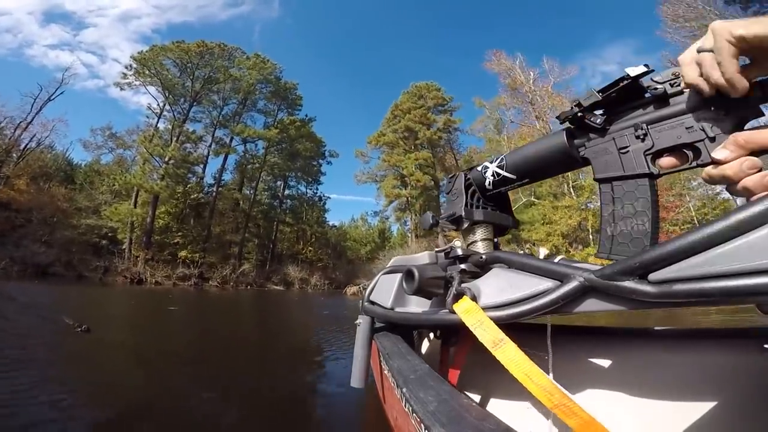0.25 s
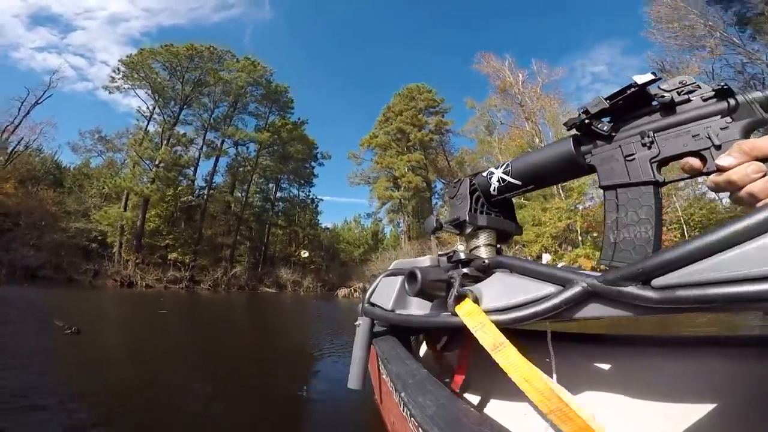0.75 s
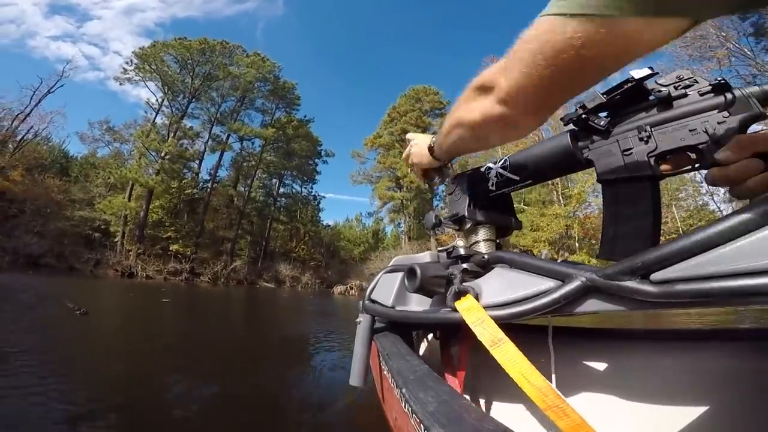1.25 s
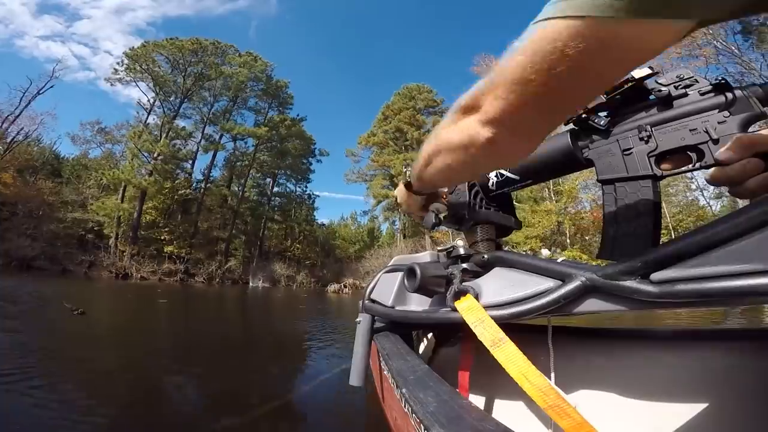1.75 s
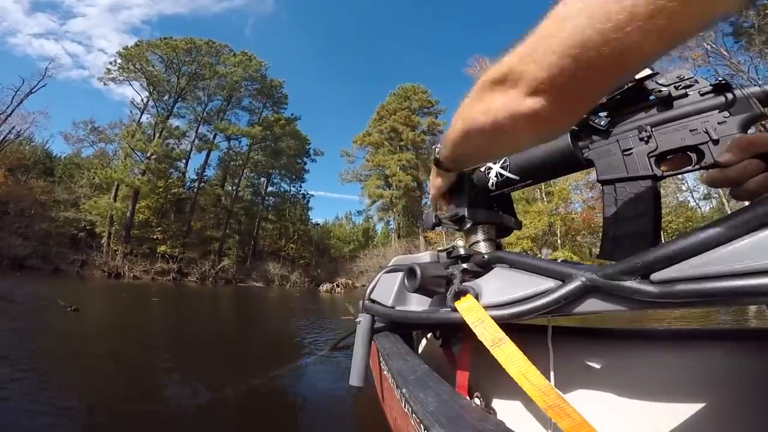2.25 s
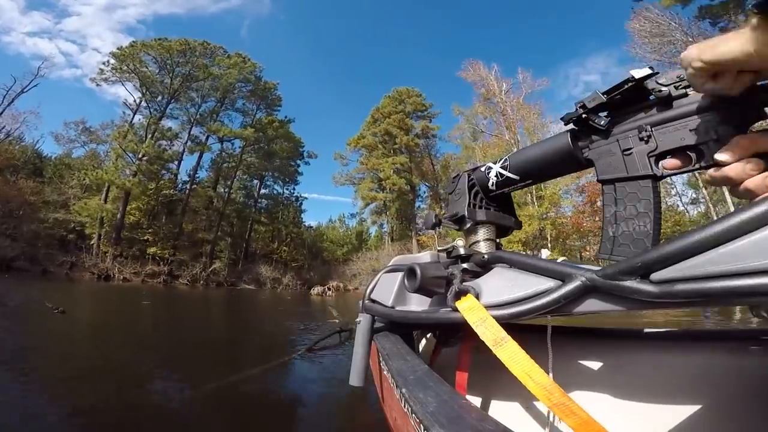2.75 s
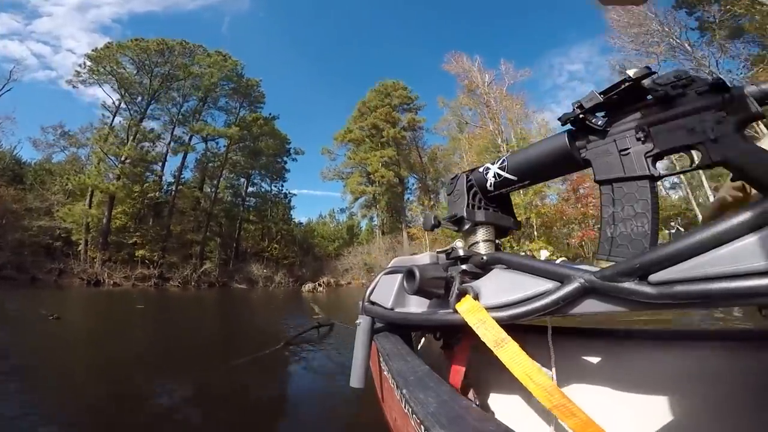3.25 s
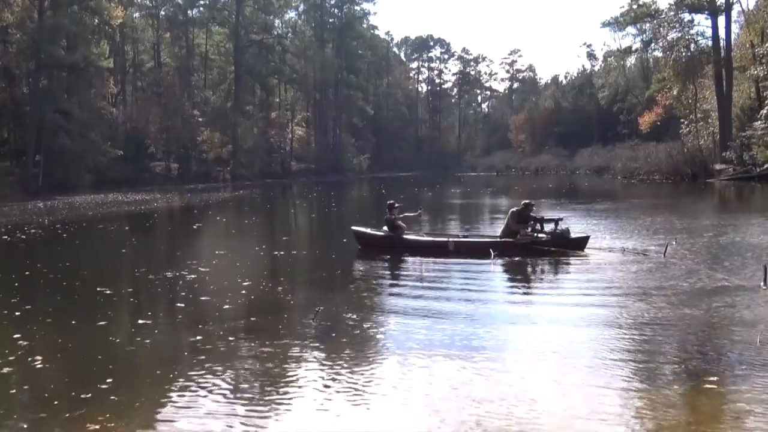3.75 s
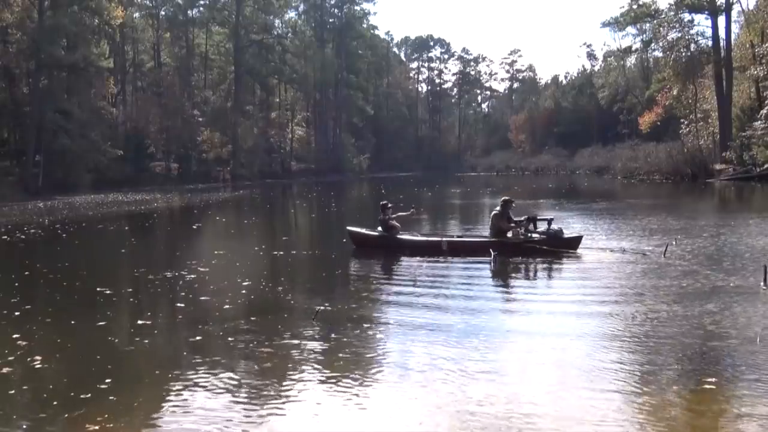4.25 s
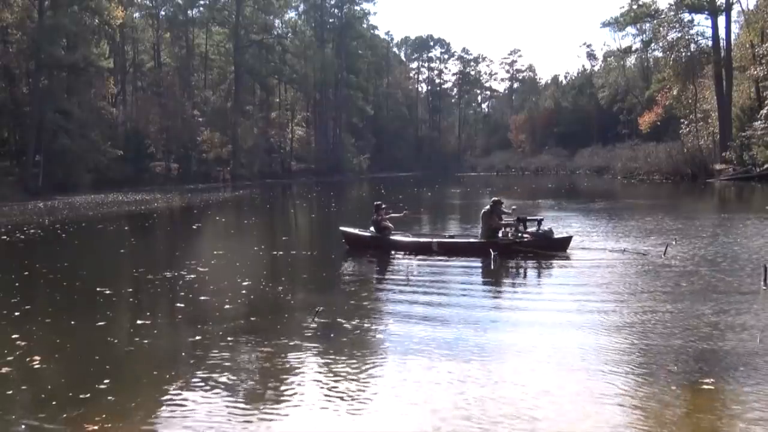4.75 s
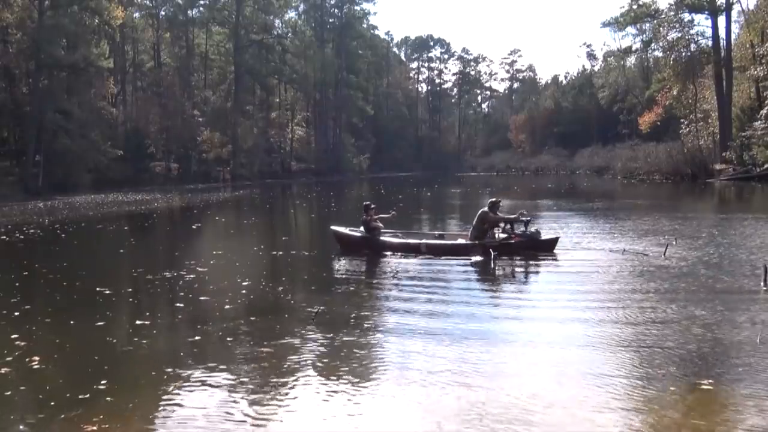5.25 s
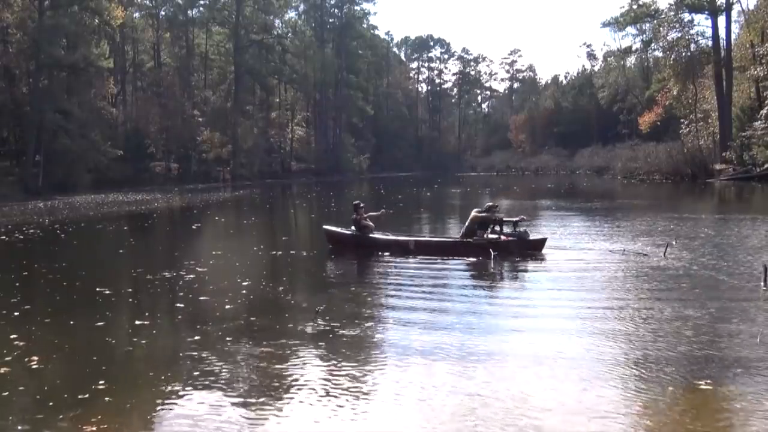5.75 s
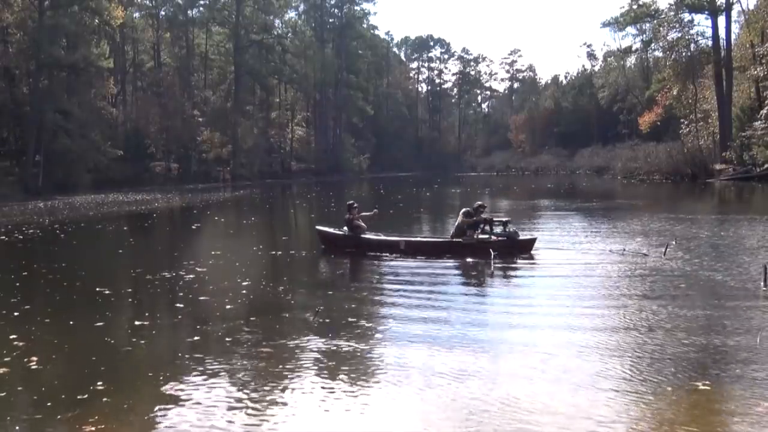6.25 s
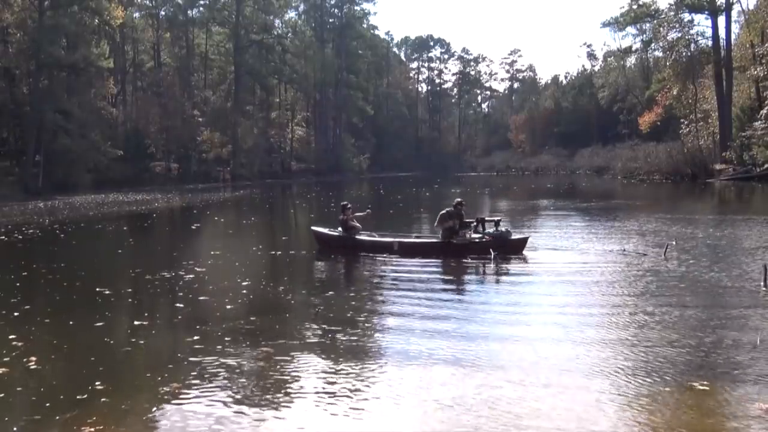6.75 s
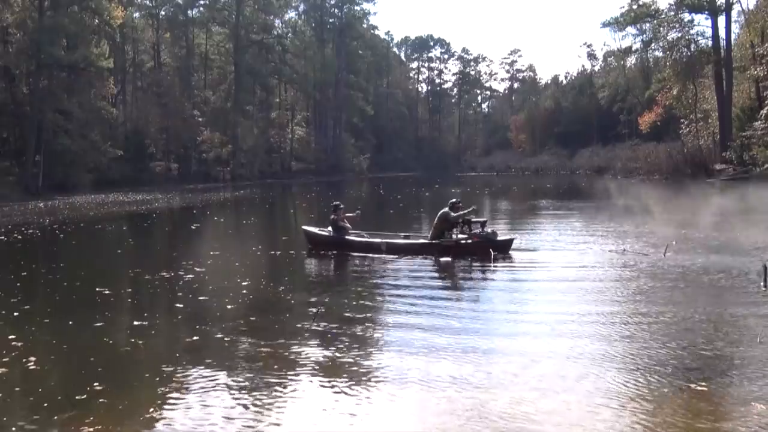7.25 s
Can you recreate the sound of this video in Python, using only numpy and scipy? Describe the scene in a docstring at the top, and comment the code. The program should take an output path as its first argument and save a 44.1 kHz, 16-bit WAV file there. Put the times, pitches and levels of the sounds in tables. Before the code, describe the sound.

A microphone on a canoe's hull picks up hands knocking and scraping on a blank-firing launcher, with hollow thumps from the boat. Twice the action is racked and a short, gassy shot pops. The sound then shifts to the bank of a forest lake, where wind buffets the microphone. Metal clacks carry over the water, and two sharp shots each roll back from the trees.

```python
"""A blank-firing launcher on a canoe, on a lake in the forest. First, from a mono camera clamped to
the hull: the boat rocks, hands load and cock the action, and two shots rush up the tube, with every
knock ringing the camera housing and drumming the hull. Then, from a stereo camera on the bank: wind
buffets both microphone ports as the last echo fades. Across the water the action clacks, the bolt
slams and the launcher fires, twice over, and the forest roars back after each shot."""
import sys
import numpy as np
from scipy import signal
from scipy.fft import rfft, irfft, next_fast_len
from scipy.io import wavfile
from scipy.ndimage import uniform_filter1d, minimum_filter1d, map_coordinates

SR = 44100
rng = np.random.default_rng(int(sys.argv[2]) if len(sys.argv) > 2 else 0)


def store_wav(level_fs):
    """Save 16-bit WAV to argv[1]."""
    pcm = np.round(np.clip(np.atleast_2d(level_fs), -1, 1) * 32767)
    wavfile.write(sys.argv[1], SR, pcm.T.astype(np.int16))


N = 330750
TIME = np.arange(N) / SR


def amp(db):
    return 10 ** (np.asarray(db) / 20)


def unit(x):
    return x / np.sqrt(np.mean(x ** 2) + 1e-20)


def along(points, hz):
    """Read (Hz, value) points on a log axis."""
    freqs, values = np.transpose(points)
    return np.interp(np.log(hz + 1), np.log(freqs + 1), values)


def curves(rows):
    """One value per sample for each column after the time."""
    times, *columns = np.transpose(rows)
    return [np.interp(TIME, times, column) for column in columns]


def wobble(rate):
    """A smooth random curve, rate knots a second."""
    return map_coordinates(rng.standard_normal(int(N * rate / SR) + 4), [TIME * rate])


def filtered(x, response):
    """x through a gain given as a function of Hz."""
    size = next_fast_len(N + 8192)
    return irfft(rfft(x, size) * response(np.fft.rfftfreq(size, 1 / SR)), size)[..., :N]


def noise(spectrum):
    """Mono noise of rms 1."""
    return unit(filtered(rng.standard_normal(N), lambda hz: amp(along(spectrum, hz))))


def resonate(modes):
    """Noise of rms 1 through a set of resonances twice, so that the valleys stay dark."""
    def body(hz):
        return sum((-1) ** k * amp(db) * 1j * hz * width / (centre ** 2 - hz ** 2 + 1j * hz * width)
                   for k, (centre, width, db) in enumerate(modes))
    return unit(filtered(rng.standard_normal(N), lambda hz: body(hz) ** 2))


def varied(modes, spread_db=4.5):
    """Noise of rms 1 in modes whose strengths wander, as each spot struck favours other modes."""
    return unit(sum(amp(db + spread_db * np.tanh(wobble(28))) * resonate([(hz, width, 0)])
                    for hz, width, db in modes))


def bursts(times, levels_db, rise, t60, tail_db, tail_t60):
    """Envelope of a row of contacts: each grinds in, dies fast and leaves a weaker tail."""
    power, lead = np.zeros(N + SR), SR // 8
    t = (np.arange(SR // 2) - lead) / SR - .002
    fall = amp(-60 * t / t60) + amp(tail_db - 60 * t / tail_t60)
    shape = np.where(t < 0, amp(60 * t / rise), fall / (1 + amp(tail_db)))
    for start, db in zip(times, levels_db):
        power[round(start * SR):][:len(t)] += (amp(db) * shape) ** 2
    return np.sqrt(power[lead:lead + N])


def strokes(rows, rise, fall):
    """Treble and mid gain of strokes that rise, hold and fall; slopes in dB per second."""
    t, power = TIME[::50], 0
    for start, length, *levels_db in rows:
        drop_db = rise * np.clip(start - t, 0, None) + fall * np.clip(t - start - length, 0, None)
        power += amp(np.array(levels_db)[:, None] - drop_db) ** 2
    return np.array([np.interp(TIME, t, np.sqrt(band)) for band in power])


def struck(times, levels_db, ring):
    """The same ring at each blow, peaking at that blow's level."""
    blows = np.zeros(N)
    blows[np.round(np.asarray(times) * SR).astype(int)] = amp(levels_db)
    return signal.fftconvolve(blows, ring / np.abs(ring).max())[:N]


# The stereo pair on the bank. Each row: frequency in Hz, left-right correlation.
PAIR_LIKENESS = [(60, 0.19), (180, 1), (550, 0.98), (1650, 0.99), (4970, 0.4), (15000, -0.53)]
def wide(spectrum):
    """Stereo noise of rms 1, alike in the mids and drifting apart in deep bass and treble."""
    def response(hz):
        angle = np.arccos(np.clip(along(PAIR_LIKENESS, hz), -1, 1)) / 2
        return amp(along(spectrum, hz)) * [np.cos(angle), np.sin(angle)]
    mid, side = filtered(rng.standard_normal((2, N)), response)
    return unit(np.array([mid + side, mid - side]))


# Leaves and microphone hiss. Each row: frequency in Hz, relative level in dB.
LEAF_SPECTRUM = [(150, -22), (250, -0.5), (393, -3), (1240, -9), (1850, -15), (5730, -19), (16000, -35.5)]
def leaves():
    """The breeze in the leaves along the bank; its level sinks slowly."""
    return amp(np.interp(TIME, [4.4, 6.2], [-37, -40]) + wobble(7)) * wide(LEAF_SPECTRUM)


# Wind on the ports. Each row: frequency in Hz, relative level in dB.
BUFFET_SPECTRUM = [(12, -6.5), (20, 2.5), (45, -1.5), (66, -6), (200, -30), (300, -47), (390, -67),
                   (660, -120)]
# Gusts. Each row: time in seconds, left level in dB, right level in dB.
GUSTS = [(3.5, -9.5, -18), (3.8, -13.5, -17.5), (4.02, -7, -14), (4.3, -12, -15.5), (4.54, -14.5, -20),
         (4.67, -10, -15.5), (4.9, -22, -30), (5.15, -12, -14.5), (5.32, -5, -8), (5.6, -5.5, -16.5),
         (5.84, -16, -21.5), (5.97, -0.5, 1), (6.15, -6, -15.5), (6.45, -16.5, -18.5), (6.62, -8.5, -17),
         (6.75, -17, -23), (7.05, -16.5, -24), (7.27, -3.5, -20), (7.45, -16, -23)]
def wind(opposed_share=0.18):
    """Buffeting right on the bank microphone; part of it pushes one port as it pulls the other."""
    common, *own = [unit(amp(2.2 * wobble(14)) * noise(BUFFET_SPECTRUM)) for _ in range(3)]
    ports = np.sqrt(opposed_share) * common * [[1], [-1]] + np.sqrt(1 - opposed_share) * np.array(own)
    return 0.84 * np.tanh(amp(curves(GUSTS)) * ports / 0.87)  # big swings flatten in the capsules


# A thin hiss. Each row: frequency in Hz, relative level in dB.
HISS_SPECTRUM = [(5000, -39.5), (7000, -11), (9000, 5), (10500, -0.5), (11500, -6), (13000, -16),
                 (16000, -41.5)]
# Its course. Each row: time in seconds, level in dB.
HISS_LEVELS = [(0, -77), (.6, -68), (.75, -100), (1.7, -80), (2.3, -69.5), (2.95, -66), (3.08, -100)]
def thin_hiss():
    """At the hull microphone, a faint high hiss creeps up before each shot."""
    return amp(curves(HISS_LEVELS)[0]) * noise(HISS_SPECTRUM)


# The boat's rumble. Each row: frequency in Hz, relative level in dB.
RUMBLE_SPECTRUM = [(12, -34.5), (20, 2.5), (70, -1.5), (130, -3), (170, -19), (290, -120)]
# Slow rocking. Each row: time in seconds, level in dB.
ROCKING = [(0.02, -40), (0.4, -28), (0.8, -48), (1.2, -62), (1.8, -41), (2.2, -32), (2.7, -33), (3.12, -40),
           (3.43, -51)]
def hull_rumble():
    """The canoe rocks under the camera, and every thump in KNOCKS shakes it."""
    starts, *_, thump_db = np.transpose(KNOCKS)
    shake = bursts(starts, thump_db - 5.5, rise=0.15, t60=0.51, tail_db=-29.5, tail_t60=0.46)
    return np.hypot(amp(curves(ROCKING)[0]), shake) * noise(RUMBLE_SPECTRUM)


# Treble of the hands, treble of the echo after each shot, mids of both. Each row: frequency in Hz, relative
# level in dB.
SLIDE_SPECTRUM = [(2200, -50), (3000, -17), (3700, -11), (4100, 0), (4500, -8), (5400, -9), (6500, -25),
                  (9200, -33), (11500, -55)]
SHOT_ECHO_SPECTRUM = [(1530, -40.5), (2600, -15), (3150, -10), (3770, -3), (4810, 0), (5570, -6), (6800, -21.5),
                      (8000, -34), (10400, -53.5), (17600, -120)]
MURMUR_SPECTRUM = [(65, -40.5), (110, -18), (123, -21), (167, -1), (306, -10.5), (409, -4), (525, -15),
                   (2210, -28), (3000, -50), (3900, -90.5), (6600, -120)]
# Soft hand moves. Each row: start and length in seconds, treble and mid levels in dB.
HAND_SLIDES = [(0.06, 0.25, -52, -44.5), (2.04, 0.13, -61.5, -46), (2.29, .07, -65, -47),
               (2.42, 0.13, -45, -36.5)]
def slides_and_echo():
    """Close by, sliding hands hiss and a faint echo follows each shot; the treble flickers."""
    still_gain = amp([[-79], [-50]])  # treble and mid between the moves
    hand_top, hand_mid = np.hypot(strokes(HAND_SLIDES, rise=830, fall=130), still_gain)
    echoes = [(start + 0.093, 0.23, -57.5, -37) for start, *_ in NEAR_SHOTS]
    echo_top, echo_mid = strokes(echoes, rise=71, fall=98)
    flicker = amp(3.6 * wobble(24.18))
    treble = flicker * (hand_top * noise(SLIDE_SPECTRUM) + echo_top * noise(SHOT_ECHO_SPECTRUM))
    return treble + np.hypot(hand_mid, echo_mid) * amp(0.5 * wobble(12)) * noise(MURMUR_SPECTRUM)


# Rasp through the hull camera's housing. Each row: frequency in Hz, relative level in dB.
RASP_SPECTRUM = [(1590, -46), (2700, -12.5), (3860, 2.5), (4350, -3.5), (5280, -17.5), (6850, -14),
                 (8430, -16.5), (10600, -32.5), (12400, -13), (15200, -30.5), (16000, -34)]
# Its treble modes. Each row: frequency and width in Hz, relative level in dB.
HOUSING_TOP_MODES = [(3920, 300, 0), (4650, 220, -2), (5250, 500, -2)]
def housing_treble(ring_share=.7):
    """The housing round the microphone splits its power between a broad rasp and ringing modes."""
    rasp = np.sqrt(1 - ring_share) * noise(RASP_SPECTRUM)
    return rasp + np.sqrt(ring_share) * varied(HOUSING_TOP_MODES)


# The housing's mid modes. Each row: frequency and width in Hz, relative level in dB.
HOUSING_MID_MODES = [(1160, 230, -1), (1740, 200, 1.5), (1450, 300, -5), (2250, 500, -5), (642.6, 400, -4)]
# Hard strokes of the action. Each row: start and length in seconds, treble and mid levels in dB.
RACK_STROKES = [(0.585, 0.034, -23, -28), (2.825, 0.016, -26, -25.5), (2.9, 0.052, -30, -35)]
def racking():
    """The action slides hard, close up, and scrapes in grains through the housing."""
    grains = unit(amp(4.8 * wobble(400)))
    top_gain, mid_gain = strokes(RACK_STROKES, rise=280, fall=650) * grains
    return top_gain * housing_treble() + mid_gain * varied(HOUSING_MID_MODES)


# Hands and action on board. Each row: start in seconds, then mid, treble and hull thump levels in dB.
KNOCKS = [(0.022, -36, -54, -36), (0.073, -42, -38.5, -28.5), (0.131, -35.5, -46.5, -44),
          (0.331, -33.5, -42, -41), (0.341, -41, -32, -28.5), (0.361, -42, -45, -40),
          (0.391, -44, -45.5, -33), (0.411, -36, -52, -30.5), (0.472, -32, -40, -29),
          (0.484, -29, -31, -27.5), (0.505, -25, -24, -28), (0.531, -20, -18.5, -23), (0.538, -20, -13, -8),
          (0.559, -28, -23.5, -20), (0.581, -25.5, -27.5, -15), (0.602, -26, -26.5, -24),
          (0.611, -20, -13, -11), (0.619, -15, -10, -16), (0.813, -33.5, -63, -33),
          (0.947, -40.5, -55, -28.5), (1.036, -46, -65, -36), (1.163, -53, -68.5, -34.5),
          (1.259, -51, -70, -48), (1.272, -48, -70, -36), (1.323, -53, -62, -31.5),
          (1.38, -39.5, -44.5, -22), (1.409, -48, -52, -25.5), (1.438, -46, -62, -42),
          (1.655, -44.5, -61, -29), (1.859, -40.5, -63, -44), (1.885, -32.5, -49, -36),
          (1.961, -41, -40, -28), (1.98, -42, -36, -16.5), (2.184, -36.5, -47, -19), (2.27, -27, -50, -35),
          (2.288, -35.5, -47.5, -24.5), (2.407, -24, -42, -32), (2.497, -28.5, -36, -22),
          (2.564, -28, -49, -37), (2.607, -25, -44, -17.5), (2.682, -40, -31, -22), (2.776, -34, -30, -31),
          (2.789, -29, -24.5, -21.5), (2.798, -26, -37, -25), (2.814, -32, -21, -24),
          (2.842, -32, -12.5, -15), (2.85, -12, -17, -8), (2.893, -13, -14, -14.5), (2.929, -16, -10, -15),
          (2.941, -21, -12, -20), (2.948, -17, -11.5, -13), (3.074, -38, -44, -28), (3.126, -35, -63, -29),
          (3.351, -41.5, -53, -26.5), (3.401, -41.5, -59, -43)]
def housing_knocks(dull_hz=7700, full_db=-18):
    """Gritty contacts ring the housing; those weaker than full_db lose extra treble above dull_hz."""
    starts, mid_db, top_db, _ = np.transpose(KNOCKS)
    mid = bursts(starts, mid_db, rise=0.029, t60=0.04, tail_db=-16, tail_t60=0.133)
    mid *= varied(HOUSING_MID_MODES)
    low, high = filtered(housing_treble(), lambda hz: np.array([hz < dull_hz, hz >= dull_hz]))
    dulled_db = top_db + 0.5 * np.minimum(top_db - full_db, 0)
    return mid + sum(bursts(starts, db, rise=0.016, t60=0.024, tail_db=-15.5, tail_t60=0.065) * band
                     for db, band in [(top_db, low), (dulled_db, high)])


# The hull as a drum. Each row: frequency and width in Hz, relative level in dB.
HULL_MODES = [(162.4, 62, 5.5), (115, 82, -3), (383, 128, -4), (256, 114, -4.5)]
# Light knocks on the hull. Each row: start in seconds, peak level in dB.
HOLLOW_KNOCKS = [(0.85, -28), (0.949, -24.5), (1.03, -35), (1.166, -27), (1.274, -31.5), (1.325, -29),
                 (1.414, -34.5)]
def hull_thumps(hollow_hz=398, hollow_t60=.075):
    """Under the camera, blows set the hull modes swinging and light knocks sound its hollow note."""
    starts, *_, thump_db = np.transpose(KNOCKS)
    drumming = bursts(starts, thump_db - 1.5, rise=0.025, t60=0.15, tail_db=-9, tail_t60=0.25)
    drumming *= resonate(HULL_MODES)
    t = TIME[:SR // 4]
    swing = sum(amp(db) * np.exp(-np.pi * width * t / 2) * np.sin(2 * np.pi * hz * t)
                for hz, width, db in HULL_MODES)
    note = amp(-60 * t / hollow_t60) * np.sin(2 * np.pi * hollow_hz * t) * (1 - np.exp(-t / 0.0017))
    return drumming + struck(starts, thump_db + 6, -swing) + struck(*np.transpose(HOLLOW_KNOCKS), note)


# Steel heard from the bank, mids and treble. Each row: frequency in Hz, relative level in dB.
STEEL_MID = [(300, -40), (500, -4), (1000, -15.5), (1800, -3), (4000, -8.5), (6000, -41)]
STEEL_TOP = [(2500, -26), (4000, -7.5), (5200, -8.5), (5800, -11), (6500, -7), (9000, -12.5), (12000, -20),
             (16000, -29)]
# Action and cases. Each row: start in seconds, mid and treble levels in dB.
CLACKS = [(3.7123, -27.5, -39), (3.733, -43, -33), (4.359, -33, -41), (4.528, -33, -27),
          (4.541, -33.5, -25.5), (4.565, -25.5, -18.5), (4.5752, -24.5, -20), (4.5952, -19, -16),
          (4.603, -12, -14.5), (4.647, -26, -18), (4.6647, -26.5, -17.5), (4.6809, -16, -14),
          (4.6957, -18, -5), (4.7004, -16, -10), (5.4347, -23, -28), (5.7776, -40, -37),
          (5.807, -33.5, -33), (5.9044, -41.5, -37), (5.931, -48, -38), (6.511, -24, -23.5),
          (6.531, -22.5, -22), (6.539, -14, -12.5), (6.573, -23.5, -17.5), (6.594, -21.5, -21),
          (6.6105, -18.5, -16), (6.62, -18.5, -9), (6.6266, -15, -8), (6.757, -32.5, -41),
          (6.812, -35.5, -43), (7.467, -19, -23.5)]
def far_clacks():
    """The action heard across the water, with a short answer from the shore."""
    starts, mid_db, top_db = np.transpose(CLACKS)
    mid = bursts(starts, mid_db, rise=0.025, t60=0.035, tail_db=-20.5, tail_t60=0.47) * wide(STEEL_MID)
    top = bursts(starts, top_db, rise=0.013, t60=0.017, tail_db=-18.5, tail_t60=0.26) * wide(STEEL_TOP)
    return mid + top * amp([[-.7], [.7]])  # the treble leans right


# The bolt slams shut. Each row: start in seconds, ring level in dB.
BOLT_SLAMS = [(4.705, -25.5), (6.63, -27.5)]
def far_bolt():
    """A cluster of close steel modes reaches the bank as one breathy band."""
    envelope = bursts(*np.transpose(BOLT_SLAMS), rise=.01, t60=0.12, tail_db=-10.5, tail_t60=0.88)
    return envelope * resonate([(5800, 590, 0)])


# The launcher tube's modes. Each row: frequency in Hz, level in dB, free ring time (t60) in seconds.
TUBE_MODES = [(2275, -2, 1), (7890, -25, 1.3), (9000, -22, 1.6), (9400, -28, 1.6), (9650, -28, 1.6)]
# Blows on the tube. Each row: start in seconds, level in dB, share of ring time left by the hand.
TUBE_TAPS = [(.73, -43, 0.9), (1.961, -35, 0.091), (3.05, -39, 0.21), (3.713, -18, 0.059),
             (5.78, -21, 0.11), (5.807, -27, 0.1)]
# Single rings: small parts of the action, and the tube's 4590 Hz mode at two taps. Each row: start in seconds,
# frequency in Hz, level in dB.
PINGS = [(2.857, 12800, -26), (4.576, 11450, -23.5), (4.6, 12900, -20), (4.605, 1760, -24),
         (5.779, 4590, -25), (5.807, 4590, -33), (6.517, 11500, -31), (6.545, 11400, -25.5)]
def steel_rings(ping_t60=0.12, held_db=-9):
    """Tube and small parts ring at both microphones; the hand damps the tube, its top modes most."""
    tones = [(start, hz, db + mode_db + held_db * (1 - share) * (hz > 7200), t60 * share)
             for start, db, share in TUBE_TAPS for hz, mode_db, t60 in TUBE_MODES]
    tones += [(*ping, ping_t60) for ping in PINGS]
    out = np.zeros(N + 2 * SR)
    for start, hz, db, t60 in tones:
        t = np.arange(int(min(t60, 2) * SR / 2)) / SR
        envelope = amp(db - 60 * t / t60) * (1 - np.exp(-t / 0.00043))
        out[round(start * SR):][:len(t)] += envelope * np.sin(2 * np.pi * hz * t)
    return out[:N] * (.75 + .35 * wobble(45))  # smeared by close modes and loose contact


# The forest's roar. Each row: frequency in Hz, relative level in dB.
FOREST_SPECTRUM = [(88, -12), (150, -14), (190, -10), (368, 2), (545, -4), (1190, -7), (1310, -14.5),
                   (1450, -8.5), (1660, -19.5), (2220, -12.5), (2760, -17), (7320, -19.5), (12700, -28.5),
                   (16000, -45)]
# Loss in the air. Each row: frequency in Hz, level change in dB per second.
AIR_LOSS = [(300, -4.5), (1500, -3), (3000, -13.5), (6000, -22.5), (12000, -71)]
# The echo dips, swells from the far shore and fades. Each row: seconds after the shot, level in dB.
ECHO_COURSE = [(0.03, -11), (0.09, -12), (0.14, -8.5), (0.26, -11.5), (0.42, -16), (0.7, -20),
               (1.05, -22.5), (1.2, -29), (1.7, -31.5), (2.08, -40)]
def forest_echo(age):
    """The forest roars back, duller as its path through the air grows; age is seconds since a shot."""
    hz, t, spectra = signal.stft(wide(FOREST_SPECTRUM), SR, nperseg=256)
    speckle = rng.standard_normal(spectra.shape[1:])
    patches_db = 0.97 * unit(uniform_filter1d(uniform_filter1d(speckle, 4, axis=0), 8, axis=1))
    since = np.clip(np.interp(t, TIME, age), 0, None)
    air_db = along(AIR_LOSS, hz)[:, None] * since
    late_db = -11 * np.exp(-since / 0.022) * (hz[:, None] > 700)  # scattered treble comes back late
    roar = signal.istft(spectra * amp(air_db + late_db + patches_db), SR, nperseg=256)[1][:, :N]
    level_db = np.interp(age, *np.transpose(ECHO_COURSE)) + 1.8 * wobble(18)  # it rolls in unevenly
    return amp(level_db) * roar * np.clip((age - .005) / 0.0041, 0, 1)


# Shots from the bank, the first heard only as its echo. Each row: start in seconds, echo gain in dB.
FAR_SHOTS = [(2.9, -4.5), (4.7843, 1.5), (6.9041, 0.5)]
def far_shots(hammer_lead_s=.0064, blast_hz=400, blast_t60=.03):
    """Across the water: hammer, crack, the muzzle blast ringing the tube, then the forest echo."""
    starts, echo_db = np.transpose(FAR_SHOTS)
    latest = np.clip(np.searchsorted(starts, TIME) - 1, 0, None)
    age = TIME - starts[latest]
    echo = amp(echo_db[latest]) * forest_echo(age)
    hammer = amp(-17) * sum(np.exp(-((TIME - start + hammer_lead_s) / 0.00029) ** 2) for start in starts)
    crack = amp(-4.5) * (age > 0) * (age < .0065)
    t = np.clip(age - .0055, 0, None)
    blast = amp(3 - 60 * t / blast_t60) * np.cos(2 * np.pi * blast_hz * t) * (t > 0)
    return (hammer + crack) * wide(STEEL_MID[:-1] + STEEL_TOP[2:]) + blast + echo


def mount_kick(age, length, hz=40, hz_per_s=1700, rise_s=.014, rebound_s=.012):
    """A shot kicks the mount: it swings ever faster, then rebounds."""
    t = np.clip(age - .025, -rise_s, None)
    swing = -np.cos(2 * np.pi * (hz * t + hz_per_s * t ** 2 / 2)) * np.clip(age / rise_s - .5, 0, 1)
    after = (age - length - .007) / rebound_s
    return np.where(after < 0, swing, -1.1 * after * np.exp(-np.abs(after)))


# The gas burst through tube and housing. Each row: frequency in Hz, relative level in dB.
GAS_SPECTRUM = [(120, -30.5), (200, -13.5), (558, 0), (722, -7.5), (933, -7), (1080, -8.5), (1940, -12.5),
                (2250, -9), (2470, -26), (3250, -26), (4350, -24), (4700, -18.5), (5400, -20), (6000, -27),
                (7680, -32.5), (13300, -42.5), (16000, -55)]
# Shots from on board. Each row: start in seconds, gas level in dB, length in seconds, kick level in dB.
NEAR_SHOTS = [(0.676, -8, 0.045, -6), (2.998, -7, 0.045, -6)]
def near_shots(tube_hz=295, pop_hz=300, pop_s=.006):
    """Close up, gas rushes up the tube, swelling until the load leaves with a low pop."""
    round_trips = lambda hz: 1 / (1 - .62 * np.exp(-2j * np.pi * hz / tube_hz))  # the tube's harmonics
    gas = unit(filtered(noise(GAS_SPECTRUM), round_trips))
    hiss = filtered(gas, lambda hz: (hz > 6200) | ((hz > 2550) & (hz < 3500)))
    out = np.zeros(N)
    for start, db, length, kick_db in NEAR_SHOTS:
        age = TIME - start
        swell = np.clip(age / 0.024, 0, 1) ** 1.54 * amp(-60 * np.clip(age - length, 0, None) / 0.04)
        held_back = 1 - np.clip(age / length, .1, 1) ** 2  # hiss comes as the load clears the muzzle
        pop = np.sin(2 * np.pi * pop_hz * age) * np.exp(-((age - length - pop_s / 2) / pop_s) ** 2)
        out += amp(db) * swell * (gas - held_back * hiss)
        out += amp(kick_db) * mount_kick(age, length) + amp(-7) * pop
    return out


def scene(switch_s=3.462):
    """The mono microphone on the hull, then the stereo pair on the bank."""
    on_hull = racking() + slides_and_echo() + hull_rumble() + thin_hiss()
    on_hull += housing_knocks() + hull_thumps() + near_shots()
    on_bank = leaves() + wind() + far_shots() + far_clacks() + far_bolt()
    return np.where(TIME < switch_s, on_hull, on_bank) + steel_rings()


def record(dry, ceiling=.96, top_hz=16000):
    """A fast limiter holds down the peaks, and the treble rolls off around top_hz."""
    needed_gain = np.minimum(1, ceiling / (np.abs(dry).max(axis=0) + 1e-9))
    gain = uniform_filter1d(minimum_filter1d(needed_gain, size=161), size=121)
    return filtered(dry * gain, lambda hz: np.clip((top_hz + 500 - hz) / 900, 0, 1) ** 2)


dry = scene()
out = record(dry)
store_wav(out)
```